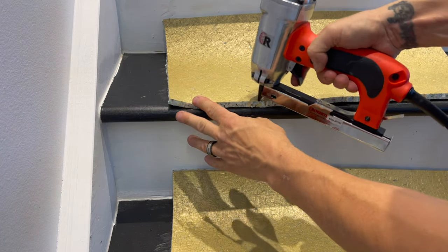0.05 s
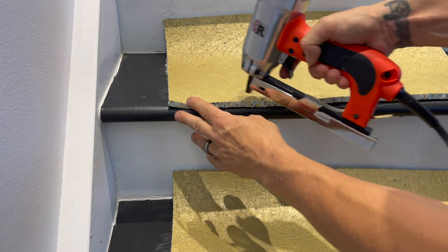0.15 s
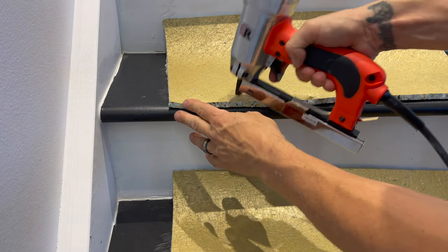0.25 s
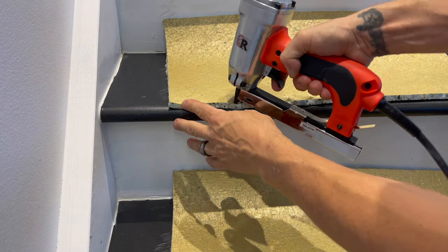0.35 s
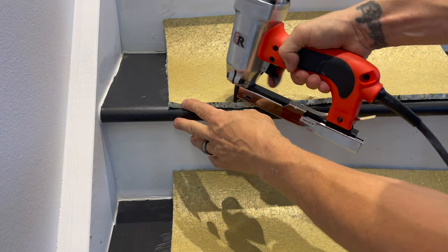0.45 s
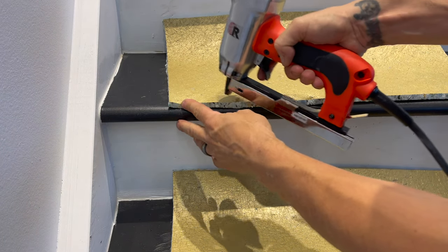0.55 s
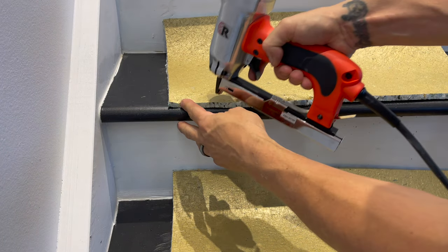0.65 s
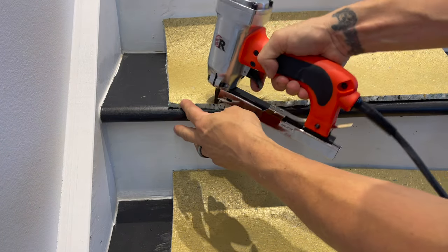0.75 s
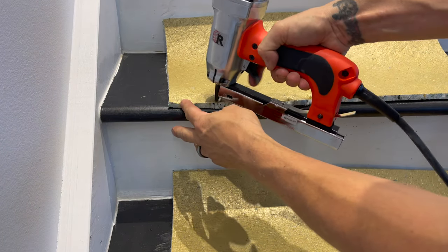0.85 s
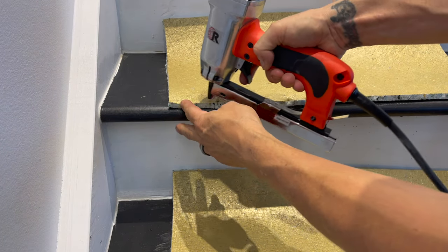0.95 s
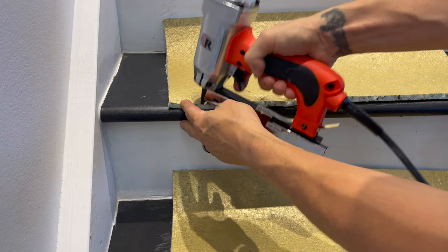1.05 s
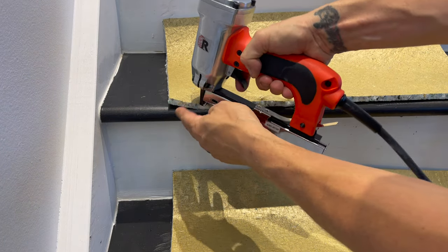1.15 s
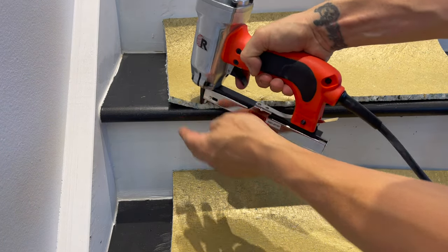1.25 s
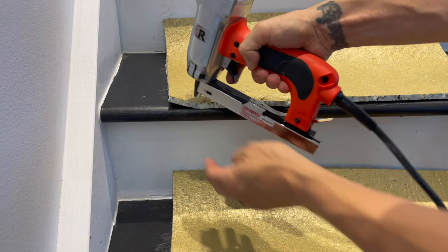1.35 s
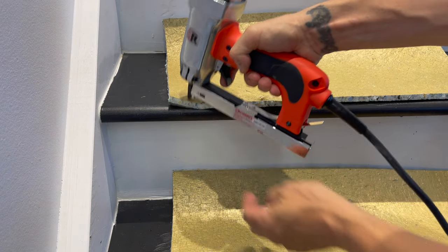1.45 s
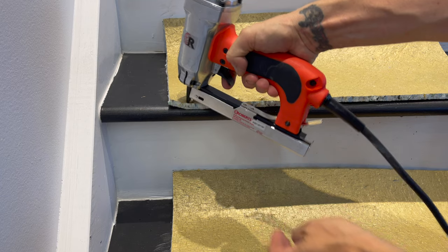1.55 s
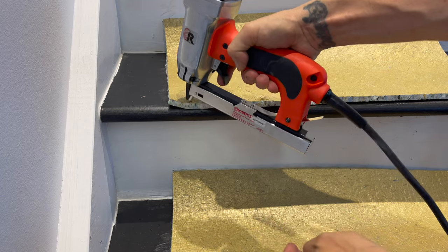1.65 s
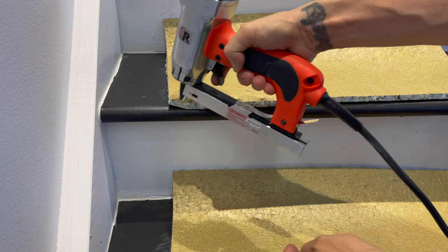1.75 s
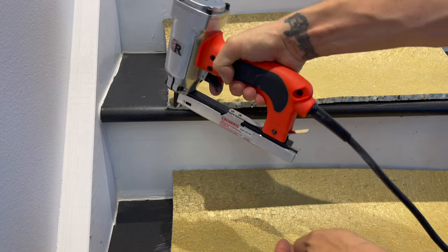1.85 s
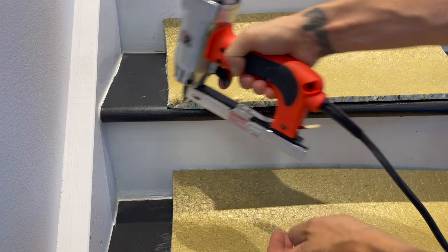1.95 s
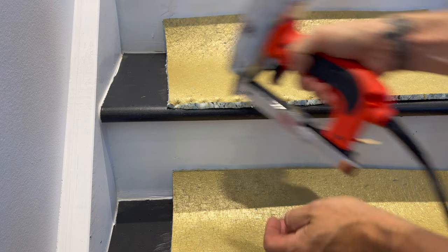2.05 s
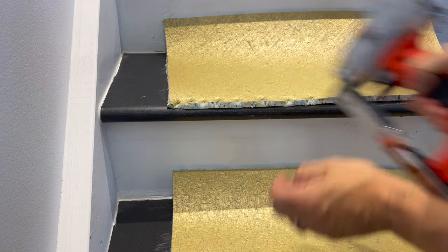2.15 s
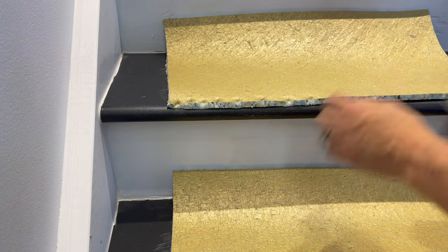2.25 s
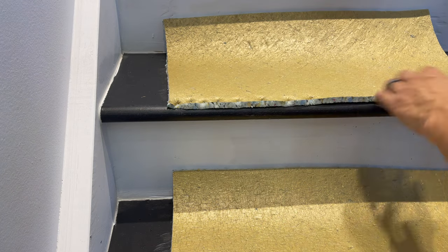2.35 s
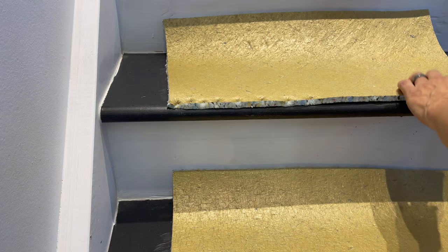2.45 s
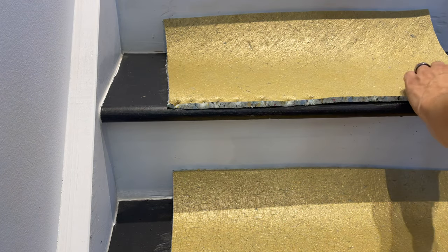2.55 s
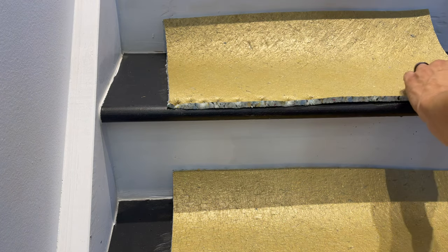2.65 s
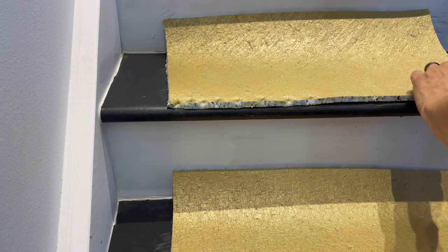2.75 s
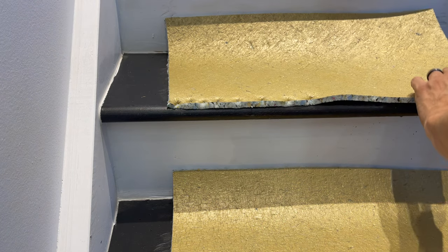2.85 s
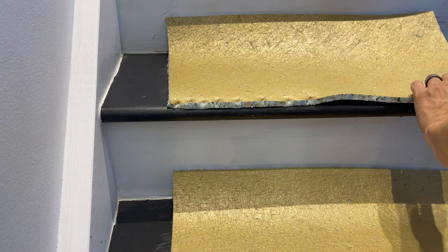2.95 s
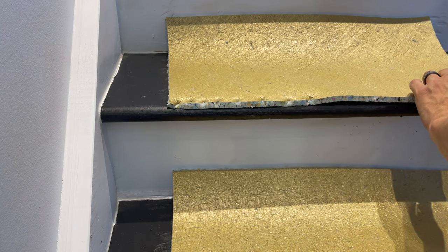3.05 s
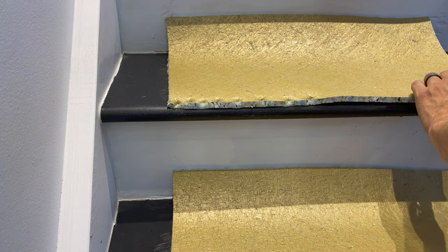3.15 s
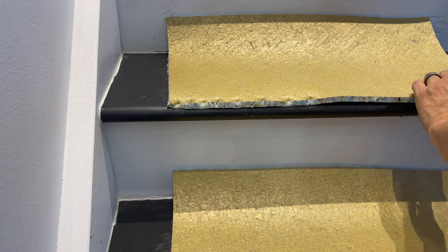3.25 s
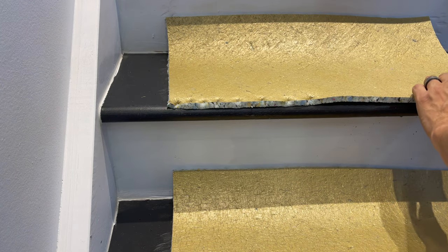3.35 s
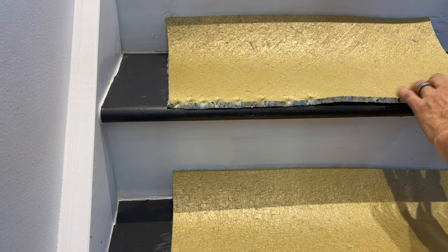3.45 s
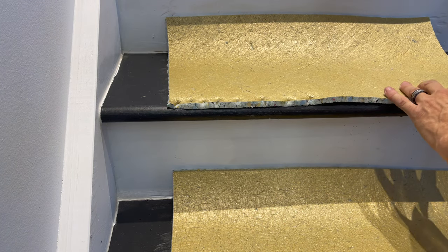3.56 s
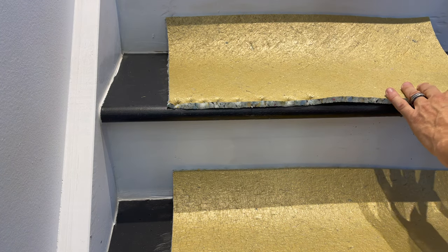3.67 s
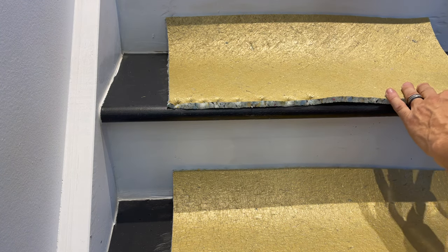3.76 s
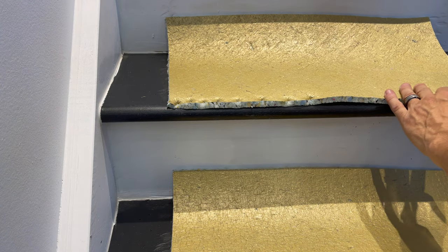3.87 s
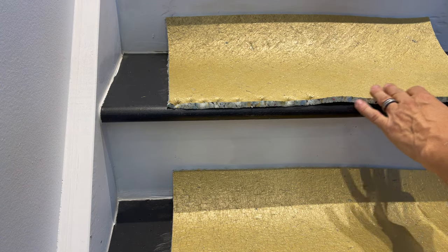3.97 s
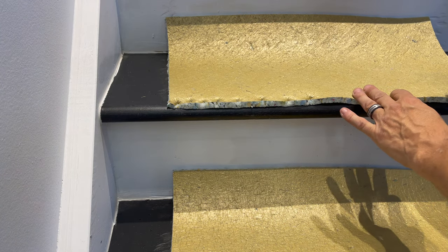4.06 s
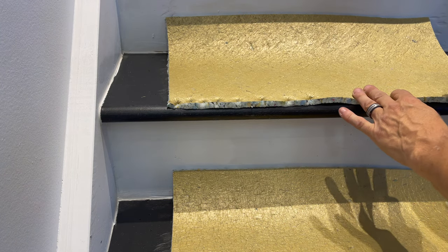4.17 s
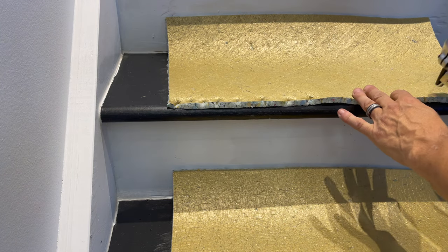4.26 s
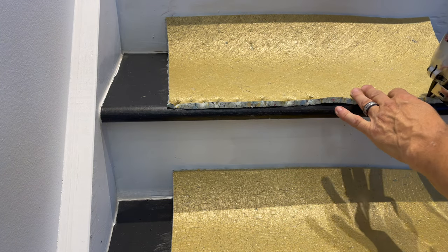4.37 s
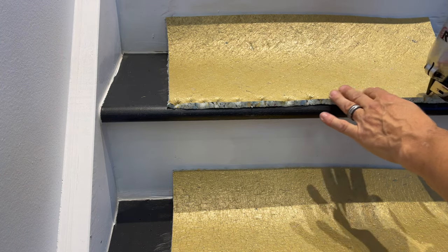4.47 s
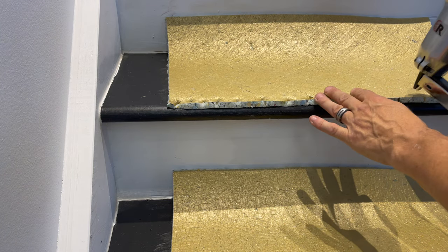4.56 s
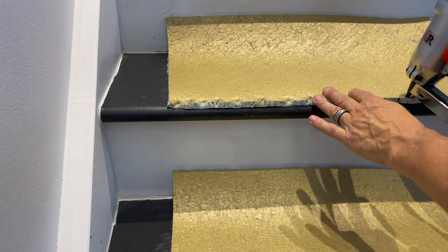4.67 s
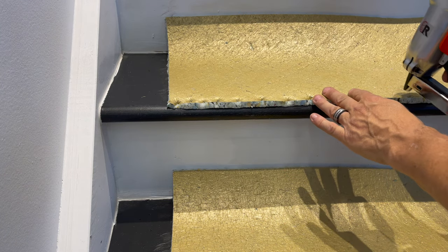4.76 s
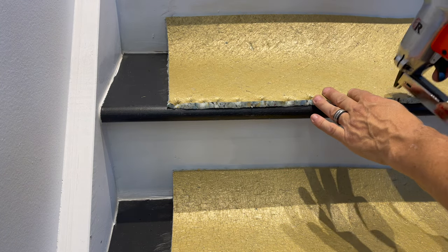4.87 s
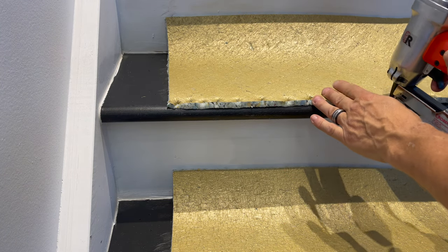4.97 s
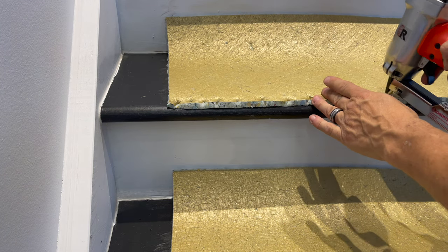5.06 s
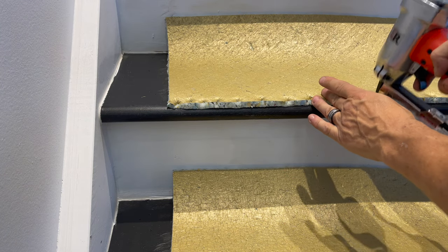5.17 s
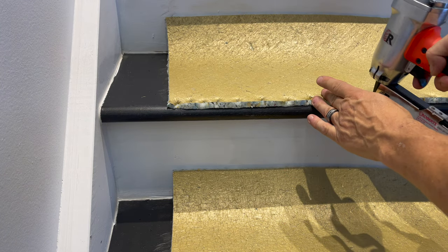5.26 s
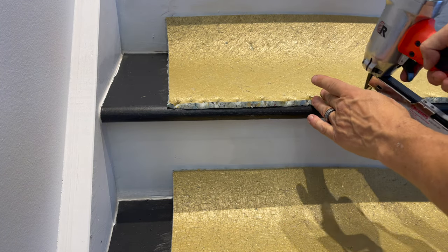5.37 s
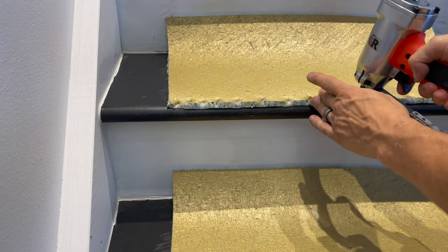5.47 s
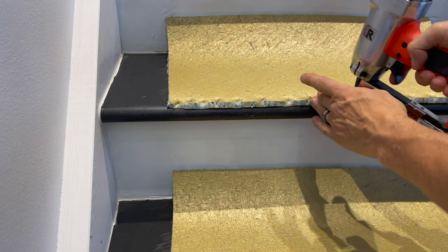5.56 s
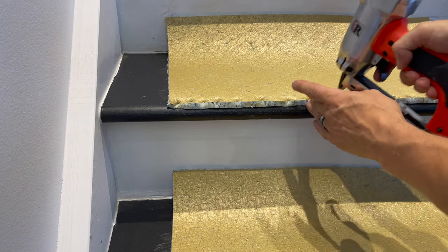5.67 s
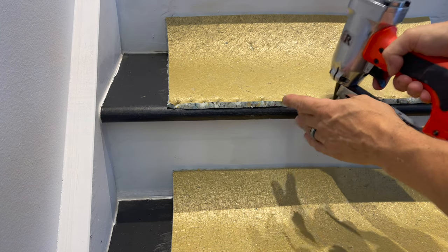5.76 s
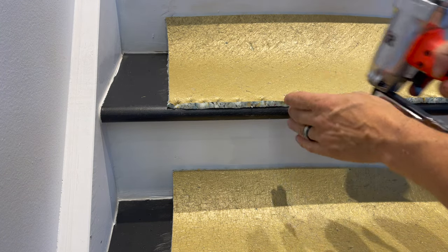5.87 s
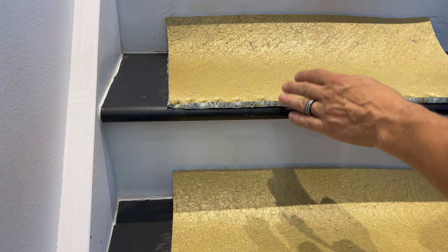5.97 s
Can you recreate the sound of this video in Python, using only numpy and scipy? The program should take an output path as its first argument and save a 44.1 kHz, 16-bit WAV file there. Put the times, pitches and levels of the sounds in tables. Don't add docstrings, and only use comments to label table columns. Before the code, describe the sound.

Close to the microphone in a reverberant indoor stairwell. The ring of an earlier staple shot is dying away at the start. Sharp, overloaded steel cracks follow at about 0.3, 0.7, 1.1, 1.5 and 1.8 s, each a kick, slam and quick rebound with a hollow wooden boom, bright housing ring, faint spring buzz and a tail of under half a second. Light nose clinks and loose ticks come between. From 2.0 to 3.2 s it turns quiet: spring shivers, a firm gritty hand stroke on foam around 2.2, weaker strokes after, small knocks at 2.1 and 2.6, and a thin, very high rising squeak near 3.1, over low appliance hum. Firing resumes at 3.4 with nine shots, tightening from every 0.3 s to about 0.27, the last at 5.7. From 3.6, nose thumps and clinks precede the shots, some with dull trigger clicks. The final ring fades over a faint sliding whine from 5.9.

```python
import sys
import numpy as np
from scipy import signal
from scipy.fft import rfft, irfft, next_fast_len
from scipy.io import wavfile
from scipy.ndimage import uniform_filter1d

SR = 44100
rng = np.random.default_rng(int(sys.argv[2]) if len(sys.argv) > 2 else 0)


def inscribe(sig):
    pcm = np.round(np.clip(np.atleast_2d(sig).T, -1, 1) * 32767)
    wavfile.write(sys.argv[1], SR, pcm.astype(np.int16))


def volts(x):
    e = np.asarray(x, float) / 20
    return 10 ** e


N = 265122
LEAD = SR // 5
MAINS_HZ = 59.96


def evened(x):
    return x / np.sqrt(np.mean(x ** 2) + 1e-20)


def read(points, hz):
    f, value = np.transpose(points)
    return np.interp(np.log(hz + 1), np.log(f + 1), value)


def add(mix, s, sound):
    part = mix[round(s * SR) + LEAD:][:len(sound)]
    part += sound[:len(part)]


def colour(x, points, tilt_db=0):
    hz = np.fft.rfftfreq(len(x), 1 / SR)
    octaves = np.log2(np.maximum(hz, 1000) / 2000)
    return evened(irfft(rfft(x) * volts(read(points, hz) + tilt_db * octaves), len(x)))


def response(hz, modes):
    return sum(volts(db) / (1 + 2j * (hz - f) / width) for f, width, db in modes)


def resonate(x, modes):
    return irfft(rfft(x) * response(np.fft.rfftfreq(len(x), 1 / SR), modes), len(x))


# f/Hz, width/Hz, level/dB
HOUSING = [(1645, 280, -3), (2138, 300, 3), (2840, 240, -10), (3298, 210, -5), (4400, 350, -9),
           (5130, 89, -2.5), (5780, 34, 2.5), (7780, 100, -4), (9280, 94, -16), (10830, 230, -4),
           (11620, 280, -16), (13400, 230, -15.5)]
# f/Hz, level/dB per Hz
CLATTER_SPECTRUM = [(88, -29), (150, 3.5), (1100, -2.5), (3160, -1.5), (3840, -5), (4490, -3.5), (8400, -9),
                    (11000, -12), (14800, -14), (16000, -27)]


def burst(rise_ms, hold_ms, t60_ms, tilt_db, ring=0.65):
    ms = np.arange(4096) * 1000 / SR
    lumps = volts(2.6 * evened(uniform_filter1d(rng.standard_normal(4096), 30)))
    clatter = colour(rng.standard_normal(4096), CLATTER_SPECTRUM, tilt_db) * lumps
    clatter *= np.minimum(ms / rise_ms, 1) * volts(-60 * np.maximum(ms - hold_ms, 0) / t60_ms)
    clatter *= 20 / np.linalg.norm(clatter) * np.sqrt((hold_ms + t60_ms / 14) / 9)
    modes = [(f * rng.uniform(0.94, 1.03), width, db + tilt_db * np.log2(f / 2000))
             for f, width, db in HOUSING]
    rung = resonate(clatter, modes)
    return clatter + ring * rung * np.linalg.norm(clatter) / np.linalg.norm(rung)


def thump(modes, push_ms, bloom_s=1e-4, spread_db=3.0):
    t = np.arange(round(SR * max(t60 for *_, t60 in modes))) / SR
    ring = np.zeros(len(t))
    for hz, db, t60 in modes:
        louder, sharper = rng.standard_normal(2)
        fall = volts(db + spread_db * louder - 60 * t / t60)
        ring += fall * np.sin(2 * np.pi * hz * (1 + 0.01 * sharper) * t)
    ring *= 1 - np.exp(-t / bloom_s)
    push = np.hanning(round(push_ms * SR / 1000) + 2)
    return -signal.oaconvolve(ring, push / push.sum())


# f/Hz, t60/s
WELL_DECAY = [(100, 0.59), (300, 0.37), (1000, 0.39), (2500, 0.39), (5000, 0.41), (10000, 0.35),
              (16000, 0.22)]
# f/Hz, level/dB
WALL_SPECTRUM = [(30, -22.5), (70, -14), (150, -2.5), (400, 7.5), (900, -3.5), (2100, -2), (3500, -4),
                 (5500, -5.5), (8000, -10.5), (11000, -14.5), (16000, -17)]


def stairwell(tilt_db=0):
    crack = colour(rng.standard_normal(2 ** 15), WALL_SPECTRUM, tilt_db)
    crack = crack + .55 * evened(resonate(crack, HOUSING))
    hz, s, z = signal.stft(crack, SR, nperseg=256)
    t60 = read(WELL_DECAY, hz)[:, None]
    patches = uniform_filter1d(rng.standard_normal(z.shape), 4, 0)
    patches = evened(uniform_filter1d(patches, 5, 1))
    well = volts(-60 * s / t60)
    near_treads = volts(5.5 - 60 * s / (0.39 * t60))
    tail = signal.istft(z * (well + near_treads) * volts(1.1 * patches), SR, nperseg=256)[1]
    return tail * np.minimum(np.arange(len(tail)) / SR / 0.0051, 1)


# f/Hz, width/Hz, level/dB
SPRING_MODES = [(4200, 500, 0), (5600, 600, -3), (8600, 450, -4), (10400, 700, -4)]


def spring():
    swing_hz, swell_hz, t60 = 75.3, 11, 0.7
    t = np.arange(2 ** 14) / SR
    swing = (swing_hz * t + rng.random()) % 1
    taps = np.exp(-swing / .12) + .35 * np.exp(-((swing + .5) % 1) / .12)
    swell = volts(4.5 * np.sin(2 * np.pi * (swell_hz * t + rng.random())) - 60 * t / t60)
    wire = resonate(taps * rng.standard_normal(len(t)), SPRING_MODES)
    rail = [(4770, 3000, 0), (9650, 1600, -1.5), (13000, 2800, -2)]
    return evened(resonate(wire, rail)) * swell


# trigger t/s, coil kick level/dB, stair boom level/dB
STAPLES = [(-.108, -21, -14), (0.325, -9, -16.5), (0.742, -13, -18.5), (1.126, -16.5, -21.5),
           (1.509, -3, -20.5), (1.826, -6, -18.5), (3.361, -12, -18), (3.694, -17.5, -19),
           (4.011, -17, -16.5), (4.311, -26.5, -15), (4.611, -24, -17.5), (4.895, -16, -15),
           (5.178, -23.5, -15.5), (5.429, -15.5, -13.5), (5.695, -21.5, -14.5)]
# f/Hz, level/dB, t60/s
STAIR_MODES = [(95, -6, 0.3), (111.6, -8.5, 0.055), (118.65, 0.5, 0.37), (130, -12, 0.4), (233, -9.5, 0.1),
               (292.1, -7, 0.2), (379, 1.5, 0.14), (419, -3.5, 0.11), (474.6, -6, 0.2), (557, -6.5, 0.21),
               (686, -1.5, 0.059), (964, -2, 0.08), (1080, -2, 0.07)]
# f/Hz, level/dB, t60/s
CORNER_MODES = [(141, 0, 0.93)]


def shots(mix):
    crest_s, travel_s, rebound_s = .3252, 0.0044, 0.0175
    blow_db = 0.24
    moved_s = 3
    for s, kick_db, boom_db in STAPLES:
        s = crest_s + round((s - crest_s) * MAINS_HZ) / MAINS_HZ
        home = s + travel_s
        back = home + rebound_s
        add(mix, s, volts(kick_db - 3.0) * burst(1.6, 1.3, 37, 2.0))
        add(mix, home, volts(blow_db - 7.0) * burst(0.14, 6.85, 26, 0.033))
        add(mix, home, volts(boom_db - 3.5) * thump(STAIR_MODES, 0.81))
        add(mix, home + .007, volts(boom_db - 10.5) * thump(STAIR_MODES, 1.7))
        add(mix, back, volts(blow_db - 14.5) * burst(0.27, 1.1, 11, -11))
        add(mix, back + .0006, -volts(boom_db - 7.5) * thump(STAIR_MODES[5:], 0.55))
        add(mix, back + .7 * rebound_s, volts(blow_db - 27) * burst(0.52, 2.5, 35, 0.5))
        add(mix, home + .003, volts(blow_db - 25.5) * stairwell())
        if s < moved_s:
            add(mix, home, volts(boom_db - 23) * thump(CORNER_MODES, 2.5, .02))
        add(mix, home + 0.017, volts(-50.5) * spring())


def noise():
    return rng.standard_normal(next_fast_len(N))


# f/Hz, level/dB per Hz
AIR_SPECTRUM = [(18, -50), (30, -27), (90, -10), (124, -4.5), (161, -37), (239, -13.5), (273, -17),
                (1430, -13.5), (1760, -37.5), (14400, -42.5), (16000, -49)]


def air():
    return volts(-76.5) * colour(noise(), AIR_SPECTRUM)[:N]


# f/Hz, width/Hz, level/dB
HUM_MODES = [(45, 60, 3.5), (120, 8, 4.5), (245, 8, -5), (370, 60, -6), (568.3, 60, -8), (770, 95, -9.5),
             (950, 50, -10.5)]
# multiple of the mains, level/dB
MAINS_LINES = [(2, -75), (4, -83)]


def hum(t):
    waver = volts(-66.5) * evened(resonate(noise(), HUM_MODES))[:N]
    return waver + sum(volts(db) * np.sin(2 * np.pi * k * MAINS_HZ * t) for k, db in MAINS_LINES)


# middle t/s, level/dB, fade/dB per s
FOAM_STROKES = [
    (2.18, -60.5, 51),
    (2.4, -73, 150),
    (2.51, -64, 64),
    (2.79, -69, 100),
    (3, -71.5, 150.5),
    (3.14, -73, 60),
]


def rub(t):
    put_down_s, taken_up_s = 2.1, 3.32
    idle_s = np.maximum(np.minimum(3 * (t - put_down_s), taken_up_s - t), 0)
    fidget_db = -64 - 56 * idle_s
    strokes_db = [db - fade * abs(t - s) for s, db, fade in FOAM_STROKES]
    hand_db = np.max(strokes_db + [fidget_db], 0)
    grit = volts(1.5 * evened(uniform_filter1d(rng.standard_normal(N), 400)))
    foam = [(423, 190, 9.0), (950, 140, 10.5), (2250, 1900, 2), (4060, 640, -3.0), (5470, 470, -8.0)]
    body = evened(resonate(noise(), foam))[:N]
    treble = evened(resonate(noise(), [(10200, 2000, 0)]))[:N] * volts(-17)
    return (body + treble) * grit * volts(np.maximum(hand_db, -84))


def clink_spectrum(hz, modes):
    return sum(volts(db) / (1 + 2j * (hz - f) / width) ** 2 for f, width, db in modes)


# f/Hz, width/Hz, level/dB
NOSE_MODES = [(670, 400, -1.5), (1520, 770, 5.5), (2084, 320, 6), (3200, 320, 0), (4580, 1200, -11.5)]
# f/Hz, width/Hz, level/dB
NOSE_TREBLE_MODES = [(6960, 2200, 5), (10600, 7400, -8)]


def clink(bright_db, rise_ms, t60_ms, pitch):
    ms, hz = np.arange(4096) * 1000 / SR, np.fft.rfftfreq(4096, 1 / SR)
    modes = [(f * pitch, width * pitch, db) for f, width, db in NOSE_MODES]
    modes += [(f, width, db + bright_db) for f, width, db in NOSE_TREBLE_MODES]
    scrape = rng.standard_normal(4096) * np.minimum(ms / rise_ms, 1) ** 2 * volts(-60 * ms / t60_ms)
    sound = irfft(rfft(scrape) * clink_spectrum(hz, modes))
    return 8 * sound / np.linalg.norm(sound)


# t/s, clink level/dB, brightness/dB, thump level/dB, pitch factor
LANDINGS = [(0.2596, -31.5, -20, -36.5, 1.14), (0.6747, -22.5, -15.5, -38.5, 1.14),
            (1.443, -25, -6, -35.5, 1.16), (1.7864, -20, 0.5, -26, 1.09), (3.6428, -16.5, -5, -16, 0.96),
            (3.969, -25, -4, -18, 0.97), (4.279, -15.5, -3.5, -16.5, 1.03),
            (4.5713, -21.5, -0.5, -19.5, 1.15), (4.8632, -12.5, -37, -12.5, 1.03),
            (5.137, -18.5, -36, -14, 1.08), (5.3967, -16.5, -24.5, -16.5, 1.23),
            (5.6624, -10.5, -31.5, -7, 1.1)]
# f/Hz, level/dB, t60/s
TREAD_MODES = [(106, 2, 0.05), (110, -0.5, 0.13), (216.7, -9, 0.11), (300, -7.5, 0.11), (400, -9, .06),
               (610, -3, .04)]


def landings(mix):
    for s, clink_db, bright_db, thump_db, pitch in LANDINGS:
        push_ms = 1.9 + 0.01 * clink_db
        add(mix, s, volts(clink_db - 3.5) * clink(bright_db - 8.5, 1.9, 24, pitch))
        add(mix, s + 0.0073, volts(clink_db - 16) * clink(bright_db - 18.5, 1.5, 50, pitch))
        add(mix, s + 0.0023, -volts(thump_db + 0.5) * thump(TREAD_MODES, push_ms, bloom_s=0.0049))
        add(mix, s + 0.0021, volts(clink_db - 35.5) * stairwell(-1.0))


# t/s, level/dB, brightness/dB, pitch factor
MAGAZINE_TICKS = [(0.265, -36.5, -14.5, 1.36), (0.28, -55, -10, 2.2), (.294, -47, -9.5, 1.5),
                  (1.018, -40, -33, 1), (1.036, -38, -23, 1.1), (1.057, -63, 4.5, 1.1),
                  (1.0896, -44, -6.5, 1.8), (1.464, -55, 4, 1.4), (1.781, -41, -7, 1.3),
                  (3.291, -48.5, -25, 0.92), (3.328, -46.5, -2.5, 1.1), (.698, -46.5, -3, 1.5)]


def ticks(mix):
    for s, db, bright_db, pitch in MAGAZINE_TICKS:
        add(mix, s, volts(db) * clink(bright_db, 0.81, 22 - 1.25 * bright_db, pitch))


# t/s, level/dB
SPRING_SHIVERS = [
    (2.03, -68.5),
    (2.111, -71.5),
    (2.191, -73.5),
]


def shivers(mix):
    for s, db in SPRING_SHIVERS:
        add(mix, s, volts(db) * spring())


# t/s, clink level/dB, brightness/dB, thump level/dB, push/ms
HAND_KNOCKS = [
    (2.076, -38.5, -19, -45.5, 0.78),
    (2.598, -40, -26, -46, 0.89),
]


def knocks(mix):
    for s, clink_db, bright_db, thump_db, push_ms in HAND_KNOCKS:
        add(mix, s, volts(clink_db - 8.5) * clink(bright_db, 0.62, 20, 0.81))
        add(mix, s, volts(thump_db - 1.0) * thump(STAIR_MODES[5:], push_ms))
        add(mix, s, volts(thump_db - 12.5) * stairwell(-28))


# t/s, f/Hz, level/dB
SQUEAK_GLIDE = [
    (3.095, 11490, -99),
    (3.109, 11762, -86.5),
    (3.195, 12376, -85.5),
    (3.215, 13440, -107),
]


def squeak(t):
    s, hz, db = np.transpose(SQUEAK_GLIDE)
    level = volts(np.interp(t, s, db, left=-140, right=-140) + 5.0)
    return level * np.sin(2 * np.pi * np.cumsum(np.interp(t, s, hz)) / SR)


# t/s, level/dB
TRIGGER_CLICKS = [
    (3.663, -30),
    (3.989, -29),
    (4.598, -34),
    (4.886, -30),
    (5.158, -28),
    (5.42, -55),
]


def triggers(mix):
    for s, db in TRIGGER_CLICKS:
        add(mix, s, volts(db) * clink(bright_db=-28.5, rise_ms=0.46, t60_ms=53, pitch=0.67))


# t/s, f/Hz, width/Hz, level/dB
CORD_WHINE = (5.92, 1650, 40, -65)


def whine(t):
    s, hz, width, db = CORD_WHINE
    slide = evened(resonate(noise(), [(hz, width, 0)]))[:N]
    return volts(db) * slide * np.clip((t - s) / 0.008, 0, 1)


def scene():
    t = np.arange(N) / SR
    work = np.zeros(N + LEAD)
    for play in (shots, landings, ticks, shivers, knocks, triggers):
        play(work)
    house = air() + hum(t) + rub(t) + squeak(t) + whine(t)
    return (work[LEAD:] + house)[None]


def top_cut(x):
    return signal.sosfilt(signal.butter(12, 16780, fs=SR, output="sos"), x)


def record(dry):
    ceiling, knee = .9, 3.5
    heard = signal.sosfilt(signal.butter(3, 75.5, "high", fs=SR, output="sos"), dry)
    rounded = heard / (1 + abs(heard / ceiling) ** knee) ** (1 / knee)
    edge = signal.firwin(301, 15900, window=("kaiser", 8), fs=SR)[None]
    finished = signal.oaconvolve(rounded, edge, "same")
    return top_cut(finished)


dry = scene()
out = record(dry)
inscribe(out)
```